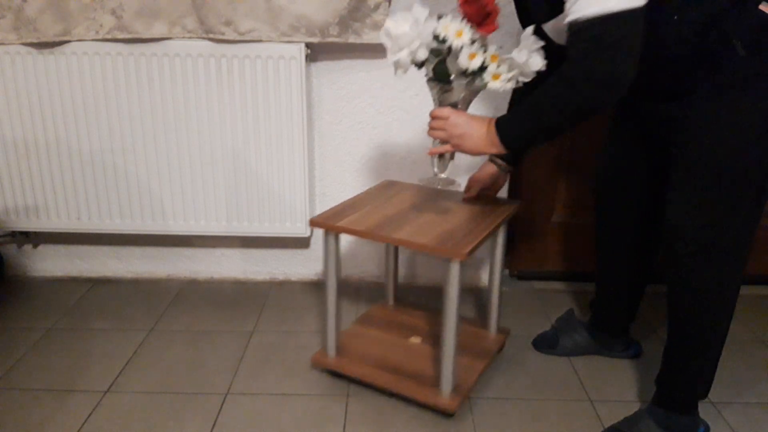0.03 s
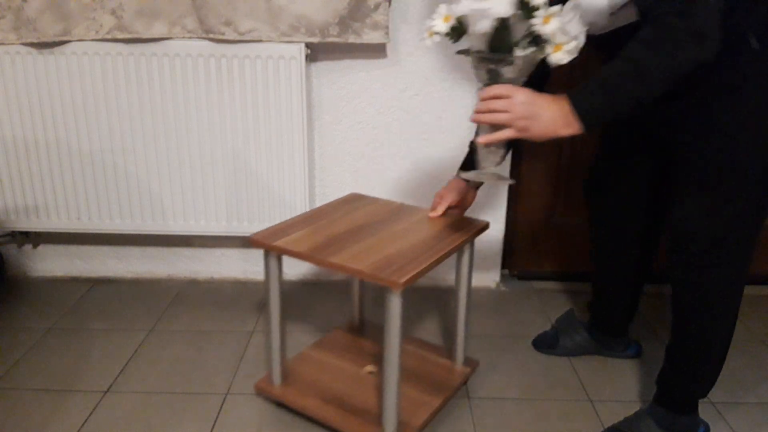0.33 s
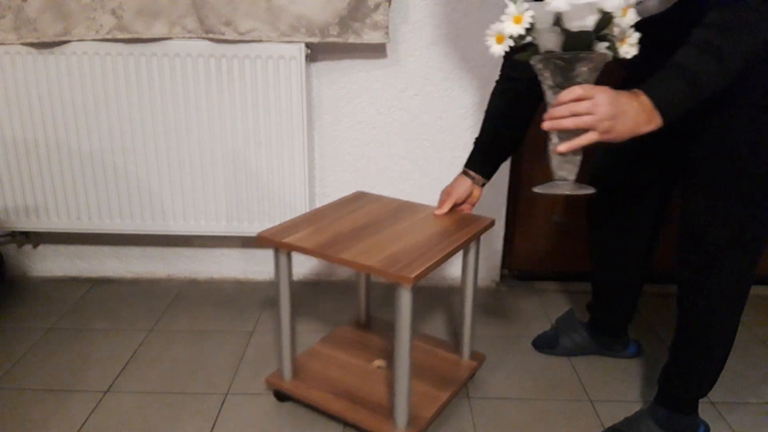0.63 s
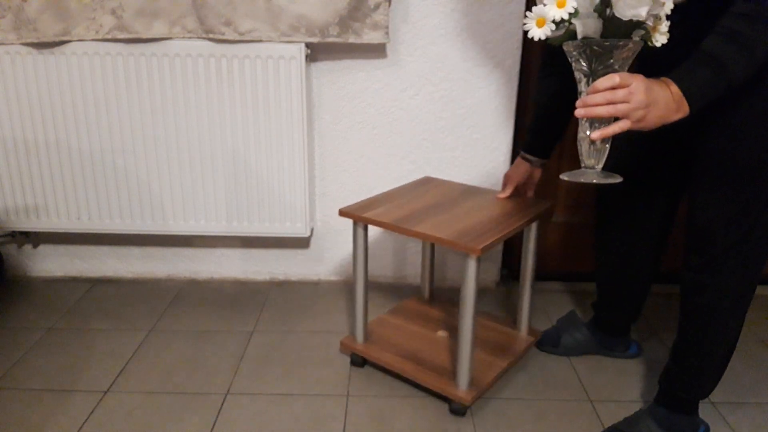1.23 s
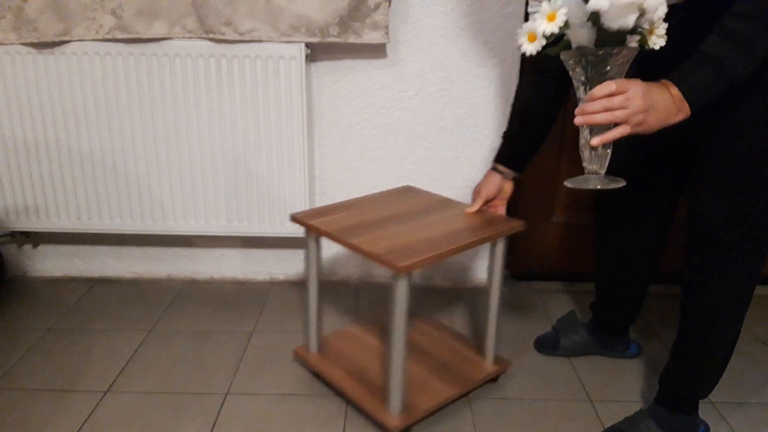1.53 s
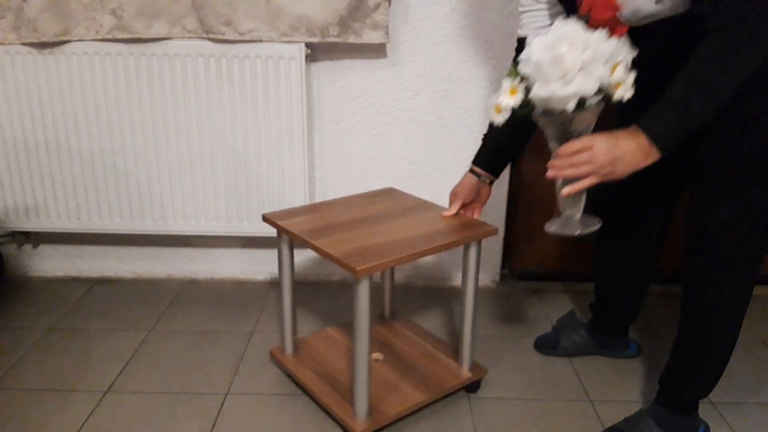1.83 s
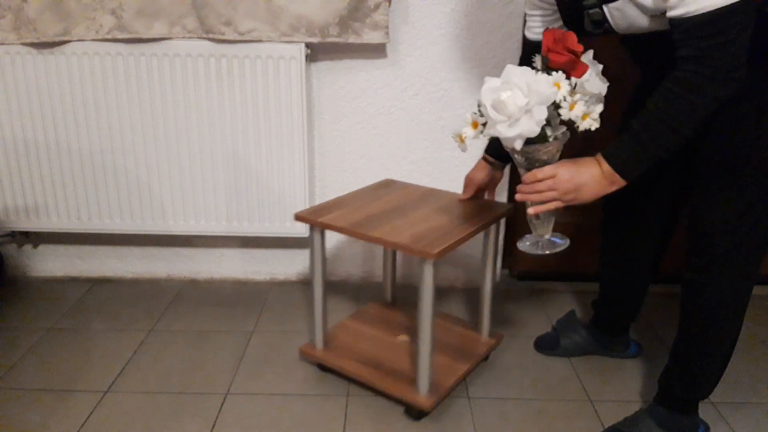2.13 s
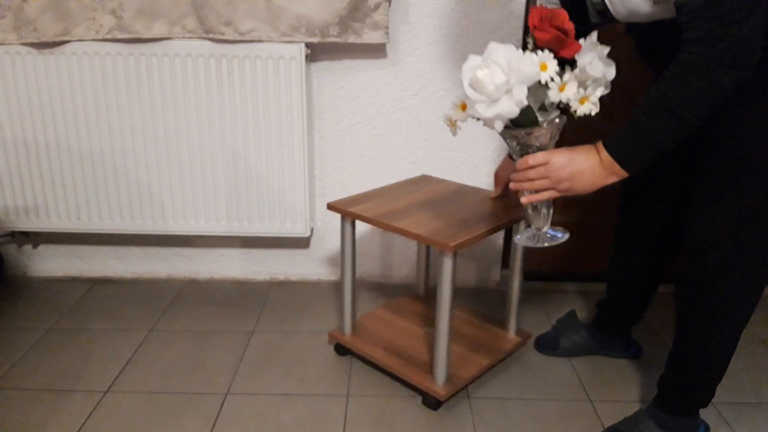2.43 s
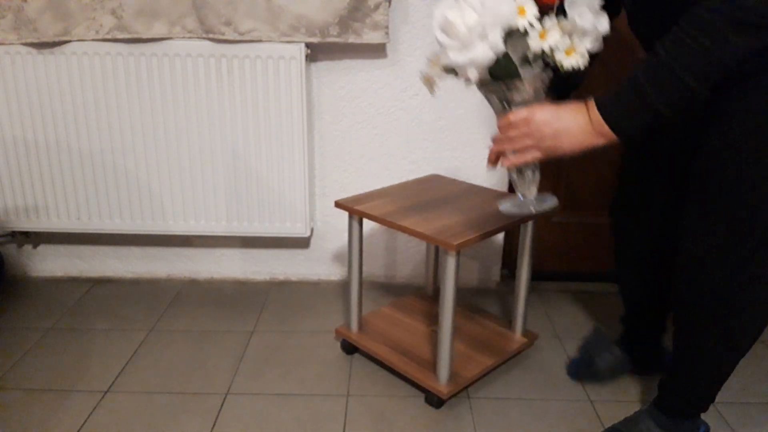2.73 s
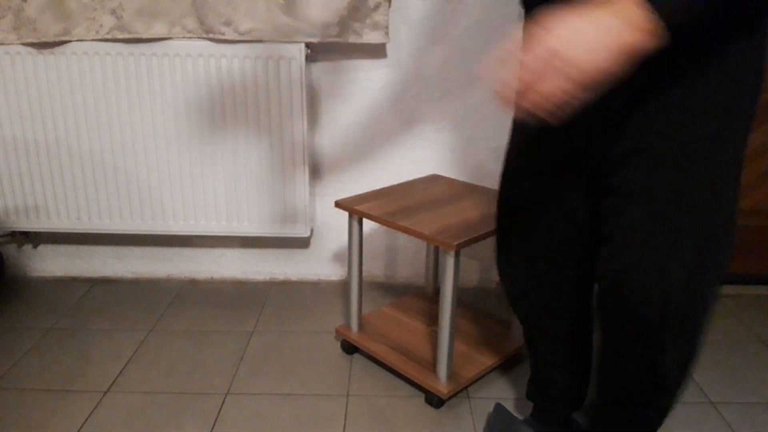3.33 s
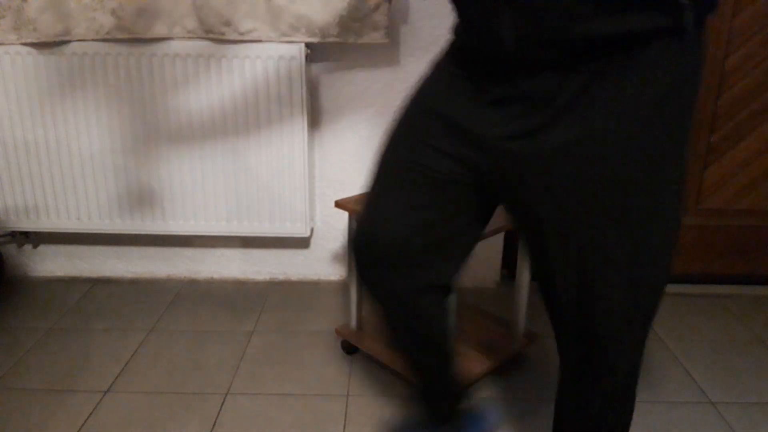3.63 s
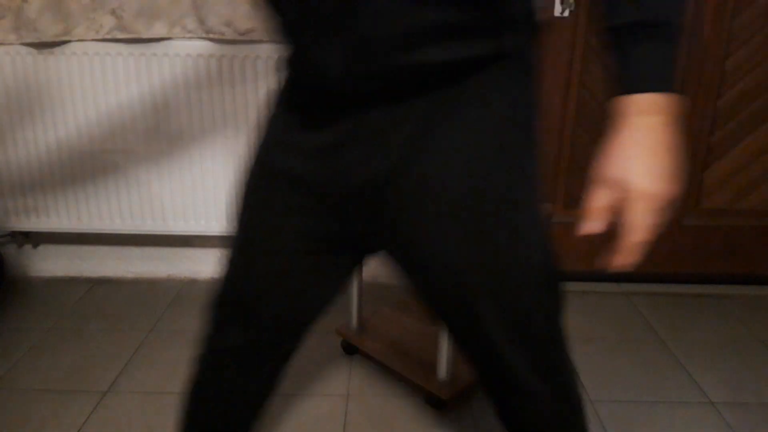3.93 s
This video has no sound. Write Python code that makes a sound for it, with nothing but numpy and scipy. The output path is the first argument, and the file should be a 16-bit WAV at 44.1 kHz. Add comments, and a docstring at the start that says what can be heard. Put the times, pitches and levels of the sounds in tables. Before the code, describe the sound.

A small wooden table rolls on casters over tiles in about four surges, with a wooden rumble, gritty grinding and loose wheels rattling and clacking. The surges peak near 0.2, 0.8, 1.5 and 2.1 seconds, and the table stops at about 2.5. Brief clothing swishes follow, with a few soft slipper steps from 3.3 to 4 seconds. The small, hard room adds a short echo.

```python
"""A small hard room with a tiled floor: a wooden table is pulled to and fro on its casters, in surges.
Grit under the wheels grinds and shakes the boards into a rumble; the loose casters chatter, knock
and clack as they swivel and cross joints. Then the table rests and someone steps away in slippers,
clothes swishing."""
import sys
import numpy as np
from scipy import signal
from scipy.fft import rfft, irfft
from scipy.io import wavfile

SR = 44100
rng = np.random.default_rng(int(sys.argv[2]) if len(sys.argv) > 2 else 0)


def wav_record(signal):
    """Record a signal, one row per channel, as 16-bit PCM in the file named by sys.argv[1]."""
    frames = np.transpose(np.atleast_2d(signal))
    bounded = np.clip(frames, -1, 1)
    # unit amplitude maps onto the largest positive 16-bit level
    quanta = np.round(bounded * 32767).astype(np.int16)
    wavfile.write(sys.argv[1], SR, quanta)


N = 176400
ROOM_T60_S = 0.37

# The pulls and pushes. Each row: start, fastest moment and stop in seconds, then the relative levels
# of the rumble and of the grinding in dB.
PUSHES = [(-.16, 0.18, 0.45, -42.5, -40.5), (0.5, 0.79, 1.2, -41.5, -42.3),
          (1.215, 1.466, 1.736, -43.5, -39.5), (1.8, 1.928, 2.5, -56, -46.5), (1.87, 2.086, 2.27, -45, -45),
          (2.167, 2.28, 2.52, -57, -50)]
# The tone of a loose caster. Each row: frequency in Hz, gain in dB.
CASTER_TONE = [(300, -23.5), (450, -10), (750, -0.5), (1400, -3.5), (2000, 2), (2700, 3.5), (3600, -2.5),
               (5300, 0), (9000, -1.5), (16000, -18)]


def undb(db):
    """Decibels to amplitude."""
    return 10 ** (np.asarray(db) / 20)


def unit(x):
    """Scale to rms 1."""
    return x / np.sqrt(np.mean(x ** 2) + 1e-20)


def along(table, hz):
    """Read (Hz, value) points on a log-frequency axis."""
    freqs, values = np.array(table).T
    return np.interp(np.log(hz + 1), np.log(freqs), values)


def colour(x, points):
    """Minimum-phase EQ through (Hz, dB) points."""
    size = 4096
    cepstrum = irfft(np.log(undb(along(points, np.fft.rfftfreq(size, 1 / SR)))))
    cepstrum[1:size // 2] *= 2
    cepstrum[size // 2 + 1:] = 0
    return signal.fftconvolve(x, irfft(np.exp(rfft(cepstrum))))[:len(x)]


def patchy(points, count=130, ripple_db=3.2):
    """Random ripple on an EQ curve: dense small modes, stirred differently every time."""
    hz = np.geomspace(300, 16000, count)
    return list(zip(hz, along(points, hz) + ripple_db * rng.standard_normal(count)))


def cut(x, hz, kind, order):
    """Low-pass or high-pass."""
    return signal.sosfilt(signal.butter(order, hz, kind, fs=SR, output="sos"), x)


def wander(hz):
    """A random drift of rms 1, gliding to a new value hz times a second."""
    return unit(np.interp(np.arange(N) / SR * hz, np.arange(2000), rng.standard_normal(2000)))


def add(out, start_s, x, db):
    """Mix in a short sound with the energy of one second at this level."""
    i = max(int(start_s * SR), 0)
    x = x[:N - i]
    out[i:i + len(x)] += x * undb(db) * np.sqrt(SR / np.sum(x ** 2))


def ring(t, t60):
    """Energy of a struck part or of the room, dying away; sums to 1."""
    energy = (t >= 0) * np.exp(-np.log(10 ** 6) * np.abs(t) / t60)
    return energy / np.sum(energy)


def room_tone():
    """The quiet of the room: a faint, bass-heavy noise."""
    # Each row: frequency in Hz, gain in dB.
    tone = [(30, -14.5), (90, -5), (160, -5.5), (280, -16.5), (500, -21), (9000, -27), (15500, -27)]
    return unit(colour(rng.standard_normal(N), tone)) * undb(-74.5)


def tap(tone, t60, wet_db):
    """One light contact: a dying burst of noise with the room's echo."""
    t = np.arange(SR // 2) / SR
    fade = np.sqrt(ring(t, t60) + undb(wet_db) ** 2 * ring(t, t60=0.35))
    return colour(rng.standard_normal(len(t)) * fade, tone)


def clothing_ticks():
    """Clothing gives a few tiny, bright ticks."""
    # Each row: start in seconds, relative level in dB.
    ticks = [(3.169, -50.5), (3.625, -57), (3.95, -61)]
    # Their tone. Each row: frequency in Hz, gain in dB.
    tone = [(800, -20), (4000, -5), (6000, -13), (8200, 8), (10000, -12), (15000, -32)]
    out = np.zeros(N)
    for start, db in ticks:
        add(out, start, tap(tone, t60=0.012, wet_db=-5), db - 18.5)
    return out


def cloth_swishes(t):
    """Trouser legs and slippers brush: a friction hiss swells and dies with each move."""
    # Each row: peak time in seconds, relative level in dB, rise and fall in seconds, low cut in Hz.
    moves = [(1.56, -44.5, 0.032, 0.1, 3500), (2.581, -59.5, 0.05, 0.12, 3520),
             (2.678, -43.5, 0.018, 0.041, 1706), (3.016, -50.5, 0.016, 0.13, 2400),
             (3.076, -42, 0.019, 0.039, 2500), (3.252, -42.5, 0.023, 0.052, 2376),
             (3.445, -38, 0.015, 0.038, 1360), (3.59, -57, 0.057, 0.035, 2500),
             (3.982, -55.5, 0.02, 0.04, 2870)]
    # The tone of sliding cloth. Each row: frequency in Hz, gain in dB.
    tone = [(650, -4.5), (1200, 6.5), (1650, -6.5), (2500, 0), (4500, 0.5), (7000, 1.5), (8900, 1),
            (10200, -13), (15500, -19)]
    out = np.zeros(N)
    for peak, db, rise, fall, low_hz in moves:
        rub = colour(rng.standard_normal(N // 4), tone)
        hiss = unit(cut(rub, low_hz, "high", order=5) + 0.098 * rub)  # a little body leaks through
        swell = np.exp(np.where(t < peak, -.5 * ((t - peak) / rise) ** 2, (peak - t) / fall))
        out += np.resize(hiss, N) * undb(db - 1.5) * swell
    return out * undb(0.89 * wander(200))


def slipper_steps():
    """Slippers knock softly on the tiles, each step with a hollow ring."""
    # Each row: start in seconds, relative level in dB.
    footfalls = [(3.299, -64), (3.4, -40.5), (3.601, -55), (3.909, -63.5), (3.949, -57.5)]
    # The tone of a sole. Each row: frequency in Hz, gain in dB.
    tone = [(60, -21), (150, -5.5), (310, -8), (450, 1), (600, -1), (950, -4.5), (1200, -13.5), (2500, -25),
            (4000, -17.5), (8500, -17.5), (11000, -43.5)]
    out, t = np.zeros(N), np.arange(SR // 2) / SR
    hollow_hz = 418
    hollow = np.sin(2 * np.pi * hollow_hz * t) * np.sqrt(ring(t, t60=0.38))
    for start, db in footfalls:
        add(out, start, tap(tone, t60=0.19, wet_db=4), db - 19)
        add(out, start, hollow, db - 27)
    return out


def chatter(length_s, t60, wet_db, count=5):
    """One contact, its irregular rebounds and their diffuse echo."""
    t = np.arange(SR * 3 // 5) / SR
    jitter, strength = rng.random((2, count))
    rebound_s = (np.arange(count) + jitter) / count * length_s
    rebound_db = -3.5 + 10 * (strength - .5)  # against the first contact
    rebounds = sum(ring(t - s, t60) * undb(db) ** 2 for s, db in zip(rebound_s, rebound_db))
    energy = ring(t, t60) + rebounds
    echo = ring(t - length_s / 2, ROOM_T60_S) * undb(wet_db) ** 2
    return rng.standard_normal(len(t)) * np.sqrt(energy / np.sum(energy) + echo)


def caster_clacks():
    """Swivels snap round and wheels hit tile edges with a bright crack."""
    # Each row: start in seconds, relative level in dB, length of the rebounds in seconds.
    clacks = [(.001, -30.5, 0.0042), (.005, -34, 0.0041), (0.654, -46, 0.009), (0.703, -37, 0.023),
              (0.747, -46, .004), (0.88, -40, 0.02), (1.032, -52.5, 0.0031), (1.203, -50, 0.0015),
              (1.248, -30, 0.0035), (1.315, -37, 0.0048), (1.451, -35.5, 0.0025), (1.523, -42, 0.013),
              (2.036, -44.5, 0.0058), (2.056, -41.5, 0.0076), (2.455, -45, 0.015)]
    # Their tone. Each row: frequency in Hz, gain in dB.
    tone = [(300, -24), (750, -6.5), (1300, -2), (1700, -8), (2700, 3), (4200, -3.5), (7000, -1), (8700, 1),
            (10200, -11), (15500, -12)]
    out = np.zeros(N)
    for start, db, length in clacks:
        add(out, start, colour(chatter(length, t60=0.017, wet_db=1), patchy(tone)), db - 17.5)
    return out


def caster_knocks():
    """A caster hits the end of its play in one sharp blow and rings briefly."""
    # Each row: start in seconds, relative level in dB, ring pitch in Hz.
    knocks = [(0.783, -33, 3380), (0.883, -28.5, 3440), (0.963, -34.5, 2500), (1.574, -36, 2500),
              (1.592, -29, 2700), (2.124, -38, 3500), (2.229, -32.5, 3420), (2.277, -42, 3620),
              (2.421, -36, 3120)]
    out, width_hz = np.zeros(N), 350
    for start, db, hz in knocks:
        blow = colour(chatter(0.002, t60=0.02, wet_db=-4), patchy(CASTER_TONE))
        ringing = undb(8.5) * signal.lfilter(*signal.iirpeak(hz, hz / width_hz, SR), blow)
        add(out, start, cut(blow + ringing, 4330, "low", order=6), db - 19)
    return out


def caster_rattles():
    """The loose casters chatter about in their play."""
    # Each row: start in seconds, relative level in dB, length of the rebounds in seconds, high cut in Hz.
    rattles = [(0.104, -33, 0.021, 3660), (0.343, -40.5, 0.026, 3370), (0.417, -44, .008, 4240),
               (0.499, -47.5, 0.014, 3420), (0.517, -40, 0.025, 3560), (0.534, -35, 0.014, 4300),
               (.583, -39, .012, 4250), (0.63, -35, 0.032, 4040), (0.705, -29.5, 0.028, 4140),
               (0.75, -35, 0.0076, 4300), (0.788, -33, 0.013, 4030), (0.864, -31.5, 0.012, 3970),
               (0.913, -37.5, 0.0092, 4100), (1, -39, .008, 3800), (1.283, -37.5, 0.0079, 4020),
               (1.332, -33.5, 0.015, 4040), (1.37, -35, 0.011, 4600), (1.594, -30.5, 0.014, 6000),
               (1.675, -40, 0.02, 4250), (1.741, -44.5, 0.016, 4030), (1.886, -41.5, 0.035, 3402),
               (1.923, -32, 0.019, 4930), (2.026, -34, 0.015, 2900), (2.053, -32.5, 0.018, 3630),
               (2.089, -34.5, 0.022, 3930), (2.166, -39, 0.026, 4100), (2.328, -46, 0.0058, 4650),
               (2.406, -36, 0.0092, 2760)]
    out = np.zeros(N)
    for start, db, length, top_hz in rattles:
        rattle = colour(chatter(length, t60=0.02, wet_db=-2.5), patchy(CASTER_TONE))
        add(out, start, cut(rattle, top_hz, "low", order=10), db - 18.5)
    return out


def push_power(t, levels_db, exponent):
    """Each push speeds up and slows in a smooth arc; its amplitude follows speed to this exponent."""
    speeds = np.array([np.sin(np.pi / 2 * np.interp(t, row[:3], [0, 1, 0])) for row in PUSHES])
    return undb(levels_db) ** 2 @ speeds ** (2 * exponent)


def grit(spread_db, per_s=2600):
    """Tiny impacts of uneven size, their strength rising and falling with the bumps of the floor."""
    hit = rng.random(N) < per_s / SR
    size_db = spread_db * np.minimum(rng.exponential(size=N), 5)
    bumps_db = 1.5 * wander(45.69)
    return unit(hit * undb(size_db + bumps_db) * rng.choice([-1, 1], N))


def table_rumble(t):
    """The wheels shake the boards, which rumble in their modes and boom in the strongest."""
    # The modes of the boards. Each row: frequency in Hz, width in Hz, gain in dB.
    modes = [(82.4, 19, -10), (131.2, 12, -.5), (172, 24, -1), (247, 25, -3), (293.7, 30, -1.5),
             (468, 22, 1), (588, 30, -4), (670.2, 21, 4), (816, 31, 0), (927, 20, -5), (1200, 60, -5)]
    # The swell of the boom. Each row: time in seconds, level in dB around which it wavers.
    boom_swell = [(0.0, -56), (0.07, -49.5), (0.37, -47), (0.51, -79.5), (0.61, -52.5), (0.74, -41),
                  (0.77, -55), (0.9, -42.5), (1.1, -50), (1.14, -69.5), (1.22, -75.5), (1.33, -53.5),
                  (1.53, -46), (1.69, -51.5), (1.74, -65), (1.92, -72), (1.96, -49), (2.07, -54),
                  (2.14, -43.5), (2.5, -67), (2.6, -89)]
    power = push_power(t, np.array(PUSHES)[:, 3], exponent=1.45)
    # The boards follow the wheels late and ring on.
    drive = np.sqrt(np.abs(signal.fftconvolve(power, ring(t, t60=0.35))[:N]))
    shake = grit(spread_db=1.5)
    wood = sum((-1) ** k * undb(db) * signal.lfilter(*signal.iirpeak(hz, hz / width, SR), shake)
               for k, (hz, width, db) in enumerate(modes))
    rumble = drive * unit(cut(wood, 73, "high", order=3)) * undb(-1)
    boom_hz = 238.2 + 3.5 * wander(40)
    boom = unit(np.sin(2 * np.pi * np.cumsum(boom_hz) / SR))
    boom_db = np.interp(t, *np.array(boom_swell).T, right=-np.inf) + 2.2 * wander(16)
    return rumble + boom * undb(boom_db)


def wheel_grind(t):
    """Hard wheels grind over the tiles and crush fine grit; the room smears it."""
    # The tone of a wheel on tile. Each row: frequency in Hz, gain in dB.
    wheel_tone = [(360, -12), (470, -3), (700, 7), (1000, -2), (1600, -1.5), (2500, -1), (3400, -10),
                  (4500, -12.5), (7000, -16), (16000, -38)]
    # The tone of the finest grit. Each row: frequency in Hz, gain in dB.
    fine_tone = [(1000, -22.5), (4000, -1), (7000, -6), (8800, 8), (10200, -12), (15500, -15)]
    power = push_power(t, np.array(PUSHES)[:, 4], exponent=0.6)
    # The first turn is a clean stop; after it the wheels scrape round between pushes until the rest.
    creep = undb(-57) * (t > 1) * (t < 2.53)
    coarse = colour(grit(spread_db=5.5), patchy(wheel_tone, count=360))
    coarse = unit(cut(coarse, 450, "high", order=2)) * undb(-2.5)
    fine = unit(colour(grit(spread_db=4.8), fine_tone)) * undb(-18)
    wet = undb(-1)
    direct = (coarse + fine) * np.sqrt((power + creep ** 2) / (1 + wet ** 2))
    tail_t = np.arange(SR * 3 // 5) / SR
    room_tail = rng.standard_normal(len(tail_t)) * np.sqrt(ring(tail_t, ROOM_T60_S))
    return direct + wet * signal.fftconvolve(direct, room_tail)[:N]


def scene():
    """All sources in one room, heard alike left and right."""
    t = np.arange(N) / SR
    rolling = table_rumble(t) + wheel_grind(t)
    casters = caster_rattles() + caster_knocks() + caster_clacks()
    person = cloth_swishes(t) + slipper_steps() + clothing_ticks()
    mono = rolling + casters + person + room_tone()
    return np.array([mono, mono])


def record(dry):
    """The recorder thins the deep bass and cuts the top."""
    top_cut = signal.ellip(10, .2, 70, 15750, fs=SR, output="sos")
    return signal.sosfilt(top_cut, cut(dry, 48, "high", order=2))


dry = scene()
out = record(dry)
wav_record(out)
```